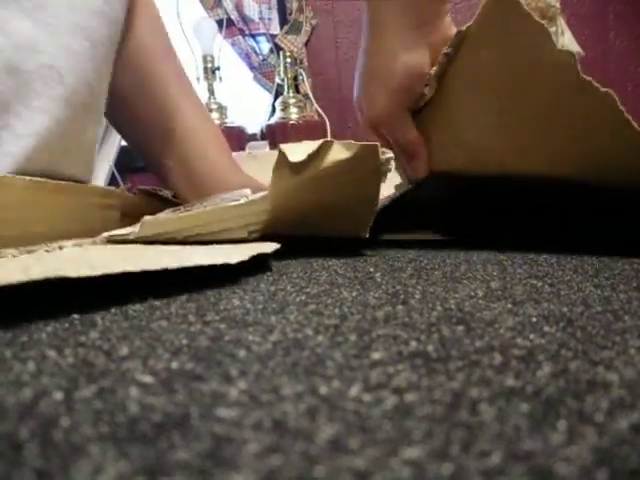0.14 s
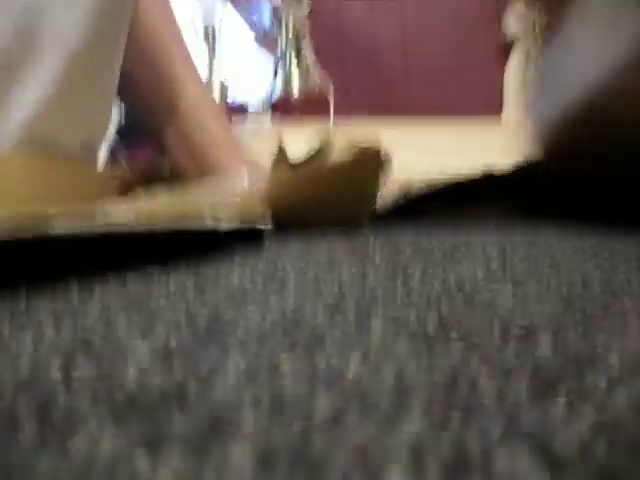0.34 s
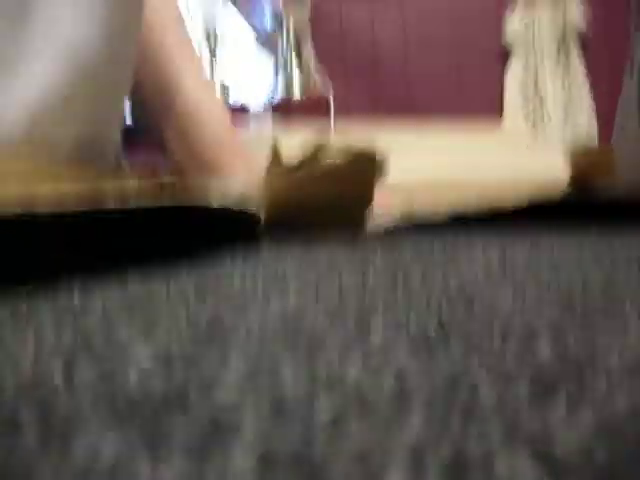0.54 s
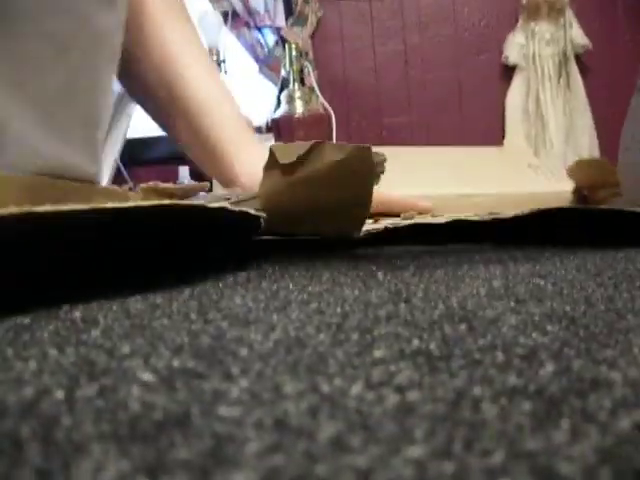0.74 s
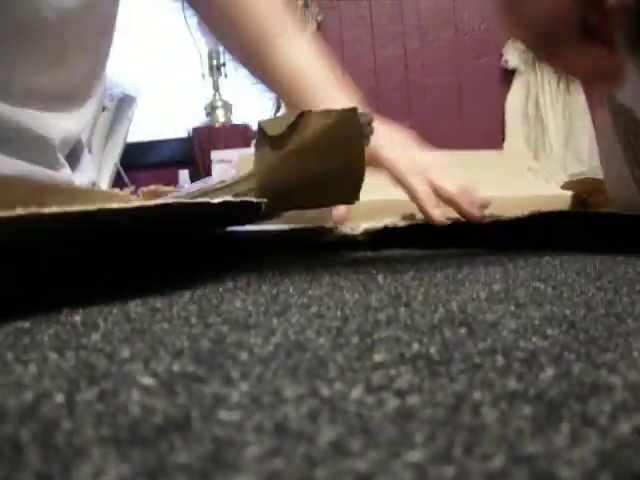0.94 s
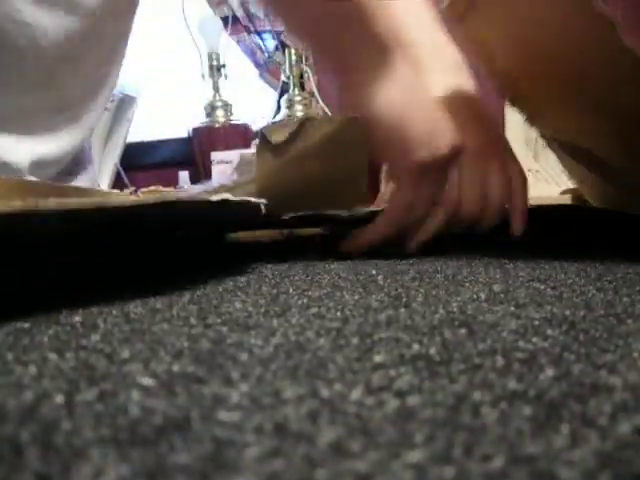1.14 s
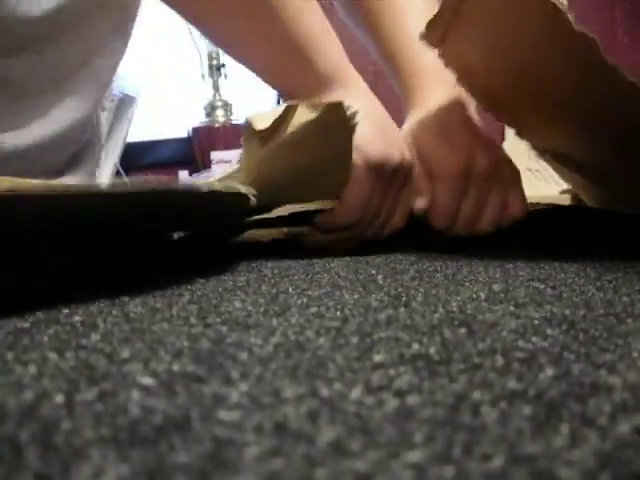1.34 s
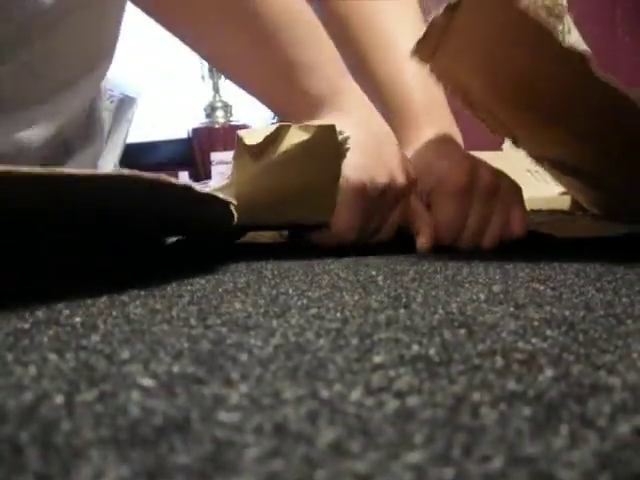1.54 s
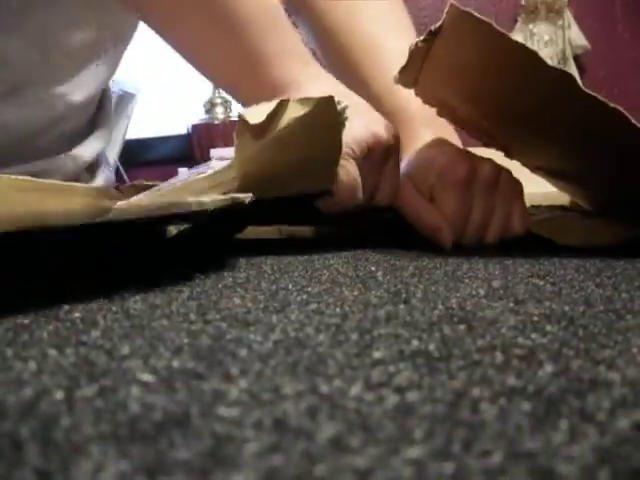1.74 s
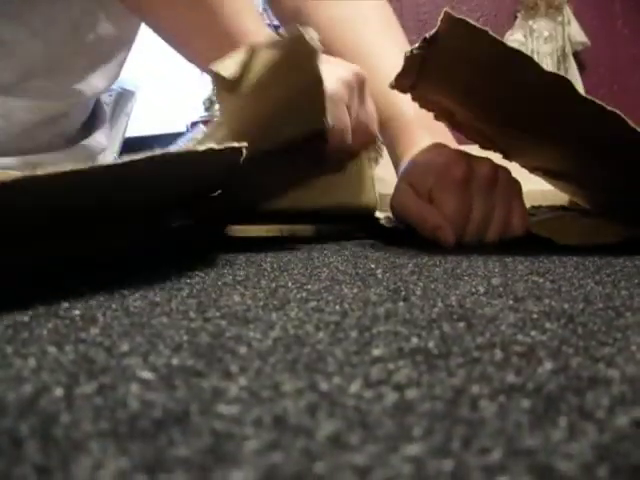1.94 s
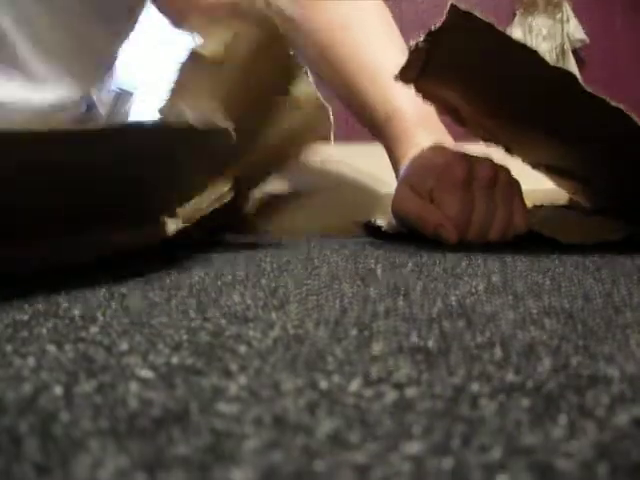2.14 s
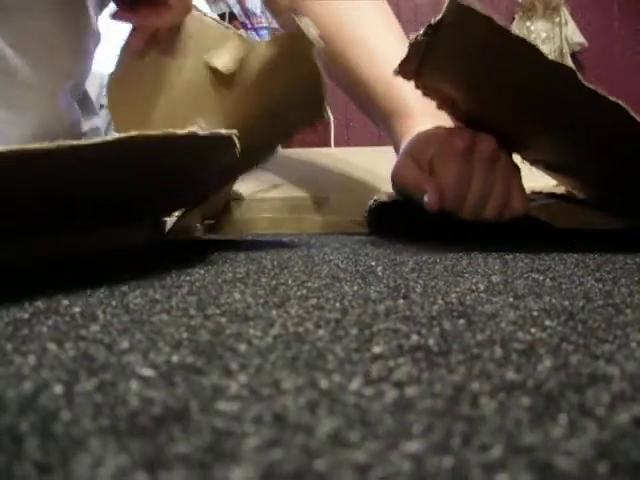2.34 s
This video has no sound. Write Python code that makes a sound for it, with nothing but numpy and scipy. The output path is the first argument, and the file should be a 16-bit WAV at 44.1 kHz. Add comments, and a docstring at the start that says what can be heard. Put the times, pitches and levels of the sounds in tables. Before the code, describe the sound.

Close, slightly overloaded tearing of a corrugated box, loud at first, dropping to faint handling ticks over soft hiss, then building to a second rip and scattered sharp snaps, with a short indoor echo.

```python
"""A fine crackle of parting fibres, close to a small camera's microphone: hands tear a corrugated
box on a carpet in a quiet room. Random impulses over a smooth rasp make the crackle and drum the panels.
Bent panels thud (two damped modes), flutes snap (short ticks with noisy cracks), the sheet booms (one low
damped swing). The tearing surges, sinks back and surges again; behind it lie a steady hush and, in the
lull, a faint sine tone."""
import sys
import numpy as np
from scipy import signal
from scipy.fft import rfft, irfft, next_fast_len
from scipy.io import wavfile
from scipy.ndimage import map_coordinates

SR = 44100
rng = np.random.default_rng(int(sys.argv[2]) if len(sys.argv) > 2 else 0)


def output_pcm(signal):
    """Save a mono or channel-first signal as 16-bit PCM at the path in sys.argv[1].

    Samples are clipped to [-1, 1] before scaling.
    """
    pcm = np.clip(np.atleast_2d(signal).T, -1, 1) * 32767
    wavfile.write(sys.argv[1], SR, np.round(pcm).astype(np.int16))


N = 105840  # samples, 2.4 s


def amp(db):
    """Turn dB into a pressure gain."""
    return 10 ** (np.asarray(db) / 20)


def unit(x):
    """Scale a signal to rms 1."""
    return x / np.sqrt(np.mean(x ** 2) + 1e-20)


def noise():
    """White noise, equal power at every frequency."""
    return rng.standard_normal(N)


def along(points, hz):
    """Read a curve of (Hz, value) points on a log frequency axis."""
    f, v = np.transpose(points)
    return np.interp(np.log(hz + 1), np.log(f + 1), v)


def coloured(x, points):
    """Shape x by (Hz, dB) points with a minimum-phase filter, so nothing sounds before its cause."""
    m = 2 ** 13
    shape_db = np.maximum(along(points, np.fft.rfftfreq(m, 1 / SR)), -80)
    cepstrum = irfft(np.log(amp(shape_db)), m)
    # folding the cepstrum forward makes the filter causal
    cepstrum[1:m // 2] *= 2
    cepstrum[m // 2 + 1:] = 0
    impulse = irfft(np.exp(rfft(cepstrum)), m)
    return unit(signal.fftconvolve(x, impulse)[:N])


def wobble(rate):
    """A smooth random curve through `rate` random knots a second."""
    knots = rng.standard_normal(int(N * rate / SR) + 4)
    return map_coordinates(knots, [np.arange(N) * rate / SR])


def clicks(rate, spread_db):
    """Random impulses, `rate` a second on average, mostly small and a few large."""
    struck = rng.random(N) < rate / SR
    sign = np.sign(rng.standard_normal(N))
    size = np.minimum(rng.exponential(size=N), 3)
    return unit(struck * sign * amp(spread_db * size))


def rings(rows, rise_s, voice):
    """Each row starts a sound that rises quickly and dies away, kept for a quarter second."""
    out, t = np.zeros(N + SR), np.arange(SR // 4) / SR
    rise = 1 - np.exp(-t / rise_s)
    for start_s, level_db, hz, t60, *more in rows:
        out[round(start_s * SR):][:len(t)] += amp(level_db) * rise * voice(t, hz, t60, *more)
    return out[:N]


# The pull on the board, phase by phase. Each row: time in seconds, level of the fibre crackle in dB
# before its trim, of the panel's drumming in dB, of the low rumble in dB, mean treble boost in dB.
PULL_PHASES = [
    [(0.0, -38, -57, -84, -2), (0.016, -48, -49.5, -77, 7.5), (0.088, -57.5, -70, -88, 3.5),
     (0.098, -50, -46.5, -79, 1.5), (0.12, -42.5, -48.5, -54, 2), (0.166, -39, -50, -63, 1),
     (0.19, -24.5, -34.5, -42, 5)],
    [(0.195, -23.5, -34.5, -42.5, -2), (0.213, -22, -19.5, -52, 12.5), (0.229, -28, -28.5, -43.5, 7),
     (0.249, -24.5, -41, -30.5, 3.5), (0.263, -40, -18, -41, 6), (0.3, -10, -43, -41, -10.5)],
    [(0.305, -29.5, -52, -49, 8.5), (0.317, -10.5, -58, -34.5, 3.5), (0.341, -25, -19.5, -32, 10.5),
     (0.413, -35.5, -44, -74, 8.5), (0.441, -47, -49, -53, 0.5), (0.5, -56, -63, -66, 5)],
    [(0.52, -62.5, -69, -56.5, 15.5), (0.596, -64.5, -64, -63, 12.5), (0.628, -59, -59, -62, 10.5),
     (0.75, -54.5, -61.5, -58.5, -2), (0.796, -52.5, -42.5, -57, 7), (0.858, -58.5, -53.5, -49, 10),
     (0.96, -69.5, -76, -99, 9), (1.046, -50, -59, -91.5, -18.5), (1.05, -71.5, -50.5, -94, -5)],
    [(1.07, -47, -49, -49.5, 1), (1.102, -63, -53, -77, 14.5), (1.166, -46, -47.5, -45.5, 2),
     (1.244, -53.5, -57, -68, 4.5), (1.43, -58.5, -50.5, -74, 6.5), (1.44, -31.5, -45, -58, -37),
     (1.508, -68.5, -63.5, -67, 10.5), (1.624, -45, -50, -61, 5.5), (1.69, -40.5, -61, -63, -5)],
    [(1.705, -61, -51, -66, -15.5), (1.711, -32.5, -36.5, -42, 1.5), (1.751, -38, -42.5, -51, 1.5),
     (1.789, -37.5, -45, -60, 7.5), (1.885, -32, -35.5, -45, -2.5), (1.903, -36.5, -58, -56, -2),
     (1.913, -33, -39, -50, -5.5), (1.94, -33, -33, -55, 2.5)],
    [(1.95, -30, -36.5, -59, 2.5), (1.986, -24, -31.5, -63, -3), (2.026, -25.5, -26.5, -34, 3),
     (2.04, -14.5, -15.5, -22, -21), (2.062, -52, -40.5, -61, -3.5), (2.078, -29, -38, -58, -3),
     (2.1, -52, -52, -64, 5)],
    [(2.11, -58, -43, -58, 19), (2.12, -41, -54, -61, -11), (2.208, -47.5, -46.5, -58, 3),
     (2.22, -30, -50, -57, 1), (2.256, -42, -44, -54.5, -9.5), (2.27, -35.5, -52, -64, 2.5),
     (2.282, -49.5, -53, -52, -6.5), (2.34, -51.5, -61.5, -88, 1.5), (2.4, -53, -63, -81, -4)],
]
# Colours of the parting fibres, the drummed panel and the low rumble.
# Each row: frequency in Hz, relative level in dB.
FIBRE_COLOUR = [(410, -21.5), (700, -2), (778, -3.5), (1020, -6.5), (1260, -18), (1770, -11), (2190, -13.5),
                (2640, -9), (2910, -12), (3270, -13), (3950, -22), (5710, -20), (7200, -22.5), (8710, -31),
                (11300, -67.5), (19200, -120)]
PANEL_COLOUR = [(59, -36.5), (100, -39.5), (166, -6.5), (210, -4.5), (268, -1.5), (322, -1), (355, -2.5),
                (661, -2), (777, -25), (1300, -10.5), (1690, -25), (2860, -120)]
RUMBLE_COLOUR = [(18, -49.5), (30, -2.5), (102, -3), (160, -1), (210, -27.5), (350, -120)]
FIBRES_PER_S, FIBRE_SPREAD_DB, RASP_SHARE = 2000, 12, 0.25  # share of power in the smooth rasp
KICKS_PER_S, KICK_SPREAD_DB = 300, 5  # small jolts that drum the panel
CRACKLE_TRIM_DB, TREBLE_FROM_HZ = -4.5, 3800


def tearing():
    """Fibres crackle, jolt the panel into drumming, and the moving sheet rumbles."""
    time_s, *columns = np.transpose(np.vstack(PULL_PHASES))
    t = np.arange(N) / SR
    crackle_db, drum_db, rumble_db, bright_db = [np.interp(t, time_s, c) for c in columns]

    parting = np.sqrt(1 - RASP_SHARE) * clicks(FIBRES_PER_S, FIBRE_SPREAD_DB)
    rasp = np.sqrt(RASP_SHARE) * noise()
    rip = coloured(parting + rasp, FIBRE_COLOUR)

    # the treble is finer and smoother than the rip below it, and flickers
    fizz = 0.47 * rip + 0.68 * coloured(noise(), FIBRE_COLOUR)
    split = signal.butter(2, TREBLE_FROM_HZ, fs=SR, output="sos")
    treble = fizz - signal.sosfilt(split, fizz)
    crackle = signal.sosfilt(split, rip) + amp(bright_db + 2.4 * wobble(60)) * treble

    kicks = clicks(KICKS_PER_S, KICK_SPREAD_DB) + 0.54 * noise()
    drum = coloured(kicks, PANEL_COLOUR)
    rumble = coloured(noise(), RUMBLE_COLOUR)

    crackle *= amp(crackle_db + CRACKLE_TRIM_DB + 0.64 * wobble(120))
    drum *= amp(drum_db + 1.2 * wobble(50))
    return crackle + drum + amp(rumble_db) * rumble


# Colour of room and microphone noise. Each row: frequency in Hz, relative level in dB.
HUSH_COLOUR = [(15, -22.5), (25, 0.5), (472, -8.5), (699, -3.5), (1030, -12), (2750, -19), (6330, -18.5),
               (7340, -17), (8710, -40), (11300, -72), (19200, -120)]
HUSH_RMS_DB = -60.5


def hush():
    """Steady room and microphone noise: white noise coloured by a fixed filter."""
    return amp(HUSH_RMS_DB) * coloured(noise(), HUSH_COLOUR)


# Panels buckling or struck. Each row: start in seconds, level in dB, pitch in Hz, t60 in seconds.
PANEL_THUDS = [(0.003, -36, 661, 0.13), (0.13, -28, 547, 0.06), (0.152, -32, 592, 0.075),
               (0.211, -15, 688, 0.14), (0.245, -0.5, 539, 0.03), (0.253, -6.5, 639, 0.035),
               (0.295, -4.5, 295.5, 0.081), (0.309, -4.5, 194, 0.048), (0.326, -9.5, 653.3, 0.064),
               (0.783, -36.5, 500, 0.032), (0.799, -44.5, 287, 0.12), (0.825, -39, 150, 0.06),
               (0.85, -43.5, 740, 0.065), (1.065, -23.5, 411, 0.064), (1.151, -51, 575, 0.12),
               (1.198, -23.5, 913, 0.02), (1.316, -21, 538, 0.025), (1.442, -20, 776, 0.02),
               (1.449, -16, 562, 0.02), (1.603, -32.5, 526, 0.054), (1.71, -30, 555, 0.13),
               (1.867, -33, 630, 0.08), (1.965, -30, 404, 0.027), (1.997, -21, 274, 0.13),
               (2.024, -8.5, 449, 0.035), (2.03, -4.5, 345, 0.02), (2.038, -14, 594, 0.05),
               (2.077, -20, 930, 0.021), (2.123, -17.5, 562, 0.021), (2.172, -27, 303, 0.048),
               (2.222, -37.5, 730, 0.04)]
THUD_RISE_S = 0.0019
OVERTONE, OVERTONE_DB = 1.6, -10.5  # second mode: times the pitch, level against the first


def thuds():
    """A hollow knock of two damped panel modes."""
    def voice(t, hz, t60):
        lower = np.sin(2 * np.pi * hz * t)
        upper = np.sin(2 * np.pi * OVERTONE * hz * t + 2 * np.pi * rng.random())
        return amp(-60 * t / t60) * (lower + amp(OVERTONE_DB) * upper)
    return rings(PANEL_THUDS, THUD_RISE_S, voice)


# Flutes snapping. Each row: start in seconds, level in dB, pitch in Hz, t60 in seconds,
# gain of the crack and click in dB.
FLUTE_SNAPS = [(0.0458, -34, 2900, 0.0072, 6), (0.0966, -40, 2980, 0.012, 2.5),
               (0.106, -32, 2610, 0.0092, -11), (0.1318, -32, 2660, 0.02, -1.5),
               (0.1603, -28.5, 2630, 0.0077, 1.5), (0.2123, -8, 1740, 0.014, 0),
               (0.235, -16.5, 2830, 0.01, -7), (0.246, -10, 2640, 0.017, -1),
               (0.2823, -25, 2730, 0.018, -6), (0.295, -12, 3270, 0.0099, -7),
               (0.3074, -14, 1824, 0.042, -2), (0.3156, -0.5, 1680, 0.0047, 7.5),
               (0.3264, -9.5, 2504, 0.0054, 8), (0.635, -48, 2740, 0.022, 9.5),
               (0.694, -44.5, 1243, 0.037, 1.5), (0.731, -38, 1220, 0.015, -1),
               (0.7594, -46, 2990, 0.022, -4), (0.778, -39.5, 1460, 0.009, 1),
               (0.8005, -26, 1800, 0.0081, -6.5), (1.037, -45.5, 1430, 0.016, 2.5),
               (1.065, -43, 1610, 0.016, 4), (1.134, -35.5, 1460, 0.013, 6),
               (1.1659, -35.5, 2460, 0.012, -5), (1.2002, -39.5, 3080, 0.019, -24),
               (1.3185, -34.5, 1520, 0.011, -6.5), (1.3547, -31.5, 2630, 0.01, -7),
               (1.3958, -35.5, 2310, 0.018, 5.5), (1.4055, -31, 2400, 0.012, 6),
               (1.4267, -38.5, 3065, 0.014, -2), (1.4423, -11, 1444, 0.011, -25),
               (1.5494, -44, 1940, 0.012, 2), (1.5627, -28.5, 1970, 0.012, -9),
               (1.5966, -31.5, 3220, 0.01, 3), (1.604, -34, 2530, 0.018, -10),
               (1.6152, -26, 2650, 0.012, -17), (1.6262, -31.5, 1915, 0.014, 6.5),
               (1.6783, -34, 2400, 0.0076, 2), (1.697, -36.5, 2490, 0.016, -13),
               (1.713, -23.5, 2480, 0.016, -0.5), (1.768, -30, 3810, 0.014, -16),
               (1.8399, -29, 1390, 0.025, 3.5), (1.8716, -31, 2574, 0.036, -12),
               (1.8821, -33, 2760, 0.017, -12), (1.911, -25, 2570, 0.014, -14),
               (1.944, -25, 1354, 0.016, -9), (1.9644, -26.5, 3150, 0.016, -4),
               (1.9885, -18, 1380, 0.014, -2), (1.9991, -20.5, 3170, 0.012, -3),
               (2.008, -18.5, 1494, 0.017, 0), (2.0158, -14, 1327, 0.0083, 0.5),
               (2.0366, -13, 1367, 0.014, 2.5), (2.0464, -13, 1776, 0.007, -18.5),
               (2.0796, -17.5, 1966, 0.0047, -6), (2.1238, -8.5, 2818, 0.014, -10.5),
               (2.1454, -18, 2446, 0.0088, -7), (2.1654, -27, 1890, 0.0068, 0),
               (2.1725, -29.5, 1270, 0.019, -9), (2.1908, -22, 1680, 0.0091, -0.5),
               (2.2193, -9.5, 2516, 0.0089, -6), (2.2281, -36, 1760, 0.022, 3),
               (2.2389, -29.5, 2470, 0.0047, 8.5), (2.2687, -15.5, 1924, 0.011, -6)]
# Colour of the crack and the dry click. Each row: frequency in Hz, relative level in dB.
CRACK_COLOUR = [(300, -33.5), (1000, -2.5), (3300, -1), (4500, -6.5), (7500, -4), (9000, -27.5)]
SNAP_RISE_S, CRACK_RISE_S = 0.00058, 0.00083
TICK_DB, SIDE_DB, CLICK_DB = 2.0, -1.5, -2
SIDE_MODES = 0.745, 1.254  # neighbouring modes, times the pitch
SIDE_LIFE, CRACK_LIFE = 0.65, 0.53  # both die sooner than the tick, times its t60


def snaps():
    """A tick of damped modes wandering in phase, with a dry click and a noisy crack on top."""
    fibre = coloured(noise(), CRACK_COLOUR)
    click = coloured(np.eye(1, N)[0], CRACK_COLOUR)[:SR // 4]
    click = np.roll(click, 30) / click.max()  # 30 samples late, past the start of the rise

    def voice(t, hz, t60, crack_db):
        # random phase drift broadens each mode
        drift = 0.63 * np.cumsum(rng.standard_normal(len(t))) * np.sqrt(hz / SR)
        main = amp(TICK_DB - 60 * t / t60) * np.sin(2 * np.pi * hz * t + drift)
        sides = sum(np.sin(2 * np.pi * k * hz * t + drift) for k in SIDE_MODES)
        sides = sides * amp(SIDE_DB - 60 * t / (SIDE_LIFE * t60))
        crack = fibre[rng.integers(N - len(t)):][:len(t)]
        crack = crack * amp(-60 * t / (CRACK_LIFE * t60)) * (1 - np.exp(-t / CRACK_RISE_S))
        return main + sides + amp(crack_db) * (crack + amp(CLICK_DB) * click)
    return rings(FLUTE_SNAPS, SNAP_RISE_S, voice)


# The whole sheet jerking on the carpet.
# Each row: start in seconds, level in dB, pitch in Hz, t60 in seconds.
SHEET_BOOMS = [(.135, -33, 150, 0.064), (.246, -20, 160, 0.065), (.300, -15.5, 163.4, 0.062),
               (.800, -29.5, 111, 0.056), (1.155, -47.5, 150, .06), (1.713, -22.5, 203, 0.029),
               (1.868, -28, 164, 0.081), (1.955, -23, 232, 0.054), (2.026, -19, 131, 0.046)]
BOOM_RISE_S = 0.0026


def booms():
    """One low, heavily damped swing of the sheet."""
    def voice(t, hz, t60):
        return amp(-60 * t / t60) * np.sin(2 * np.pi * hz * t)
    return rings(SHEET_BOOMS, BOOM_RISE_S, voice)


TONE_HZ, TONE_RMS_DB = 737, -60  # centre values: both waver
TONE_START_S, TONE_END_S, TONE_FADE_S = 0.88, 1.46, 0.042
TONE_WAVER = 0.15  # phase, in radians


def tone():
    """A faint background sine, wavering slightly in phase and level."""
    t = np.arange(N) / SR
    gate = np.clip(np.minimum(t - TONE_START_S, TONE_END_S - t) / TONE_FADE_S, 0, 1)
    sine = np.sqrt(2) * np.sin(2 * np.pi * TONE_HZ * t + TONE_WAVER * wobble(12.2))
    return sine * gate * amp(TONE_RMS_DB + wobble(9.9))


# Decay of the quiet room. Each row: frequency in Hz, t60 in seconds.
ROOM_DECAY = [(150, 0.21), (1500, .25), (8000, .15)]
ROOM_DB, ROOM_BLOCK_S = -14, 0.1


def room(x):
    """Each frequency dies at its own speed; each 0.1 s block gets a fresh random tail, kept diffuse."""
    out, step = np.zeros(N + 2 * SR), int(ROOM_BLOCK_S * SR)
    for i in range(0, N, step):
        hz, t, z = signal.stft(rng.standard_normal(SR // 3), SR, nperseg=256)
        decay = amp(-60 * t / along(ROOM_DECAY, hz)[:, None])
        tail = signal.istft(z * decay, SR, nperseg=256)[1]
        wet = signal.fftconvolve(x[i:i + step], tail / np.linalg.norm(tail))
        out[i + 200:][:len(wet)] += wet  # echoes start 200 samples after the direct sound
    return out[:N]


def scene():
    """The box, its echo in the room and the background."""
    hits = snaps() + thuds() + booms()
    box = tearing() + hits
    echo = amp(ROOM_DB) * room(box)
    background = tone() + hush()
    return (box + echo + background)[None]


CLIP_AT, CLIP_KNEE = 0.66, 5  # ceiling in full scale, sharpness of the bend
ROLLOFF_HZ, TOP_HZ = 7600, 8860


def record(dry):
    """The input saturates on peaks; the camera rolls off the top and keeps nothing above its limit."""
    m = next_fast_len(N + SR)
    hz = np.fft.rfftfreq(m, 1 / SR)
    held = dry / (1 + np.abs(dry / CLIP_AT) ** CLIP_KNEE) ** (1 / CLIP_KNEE)
    response = (hz < TOP_HZ) / np.sqrt(1 + (hz / ROLLOFF_HZ) ** 24)
    return irfft(rfft(held, m) * response, m)[..., :N]


dry = scene()
out = record(dry)
output_pcm(out)
```